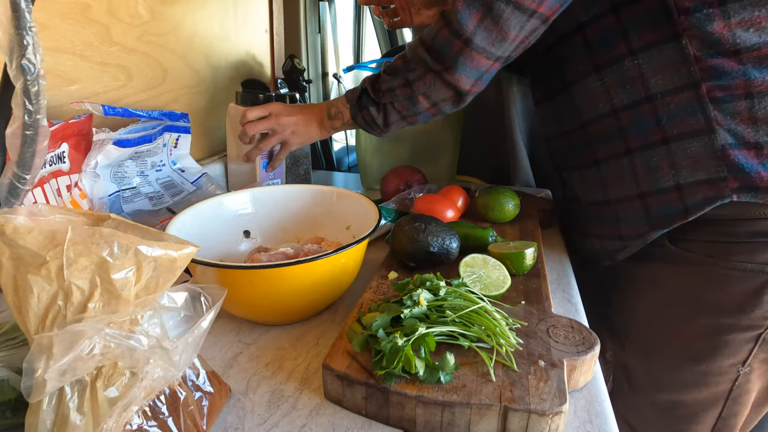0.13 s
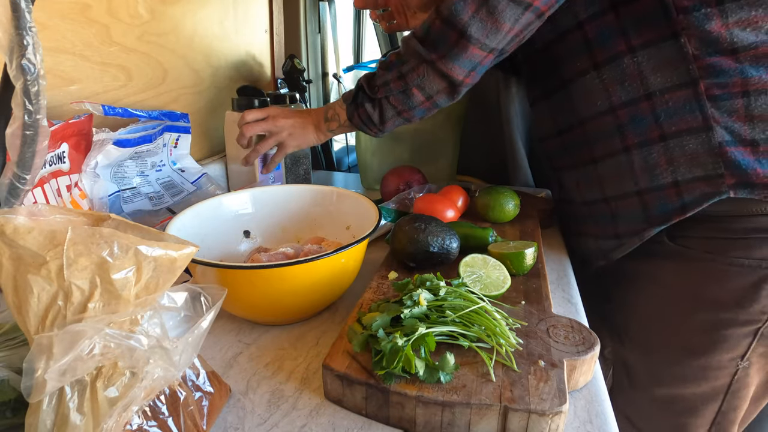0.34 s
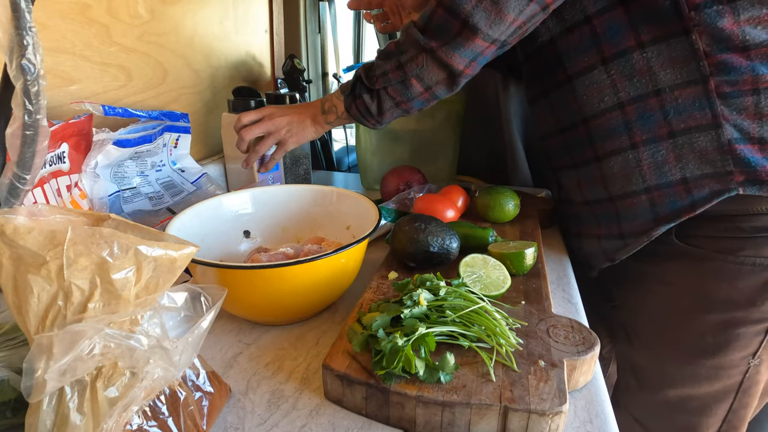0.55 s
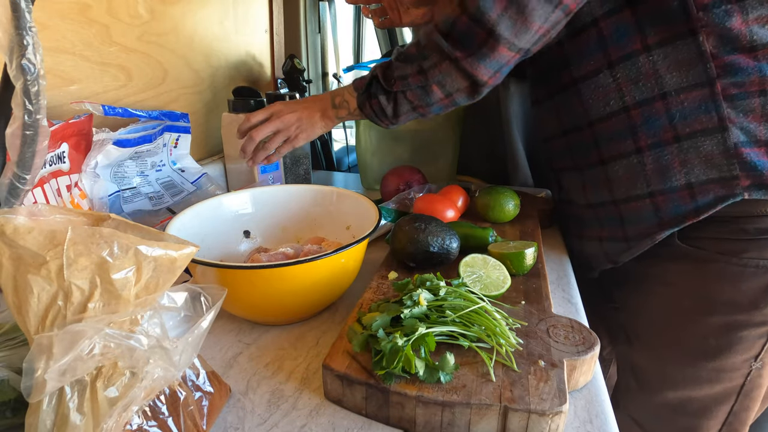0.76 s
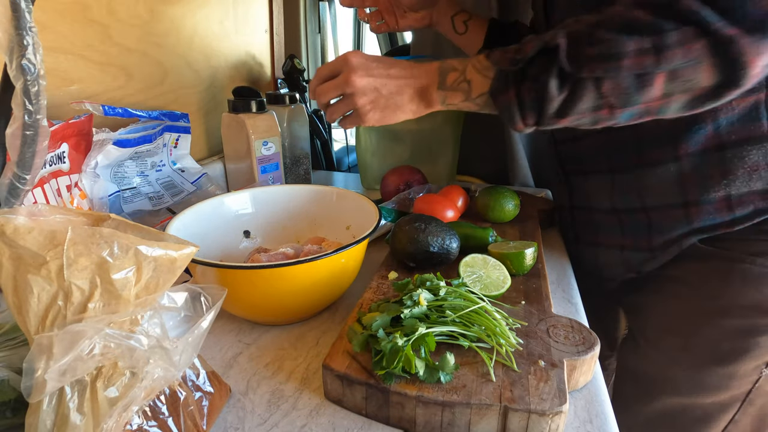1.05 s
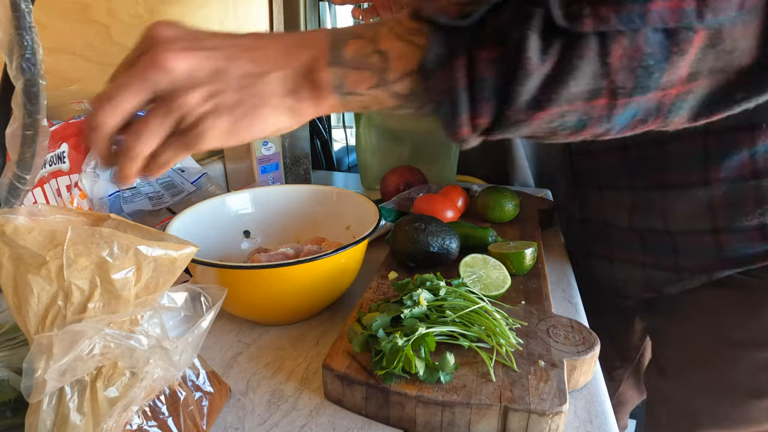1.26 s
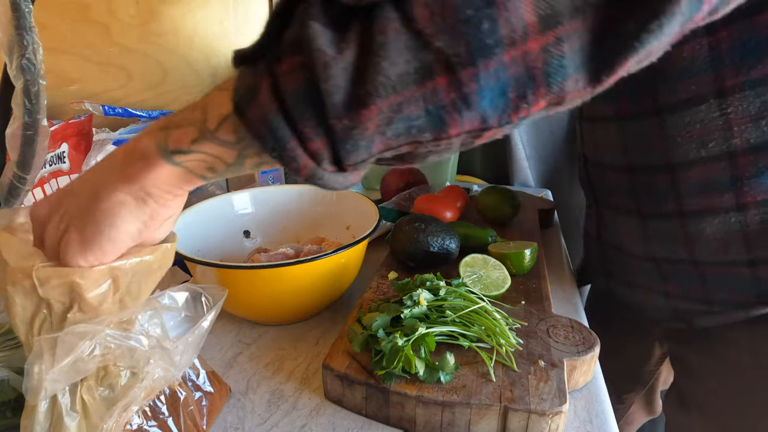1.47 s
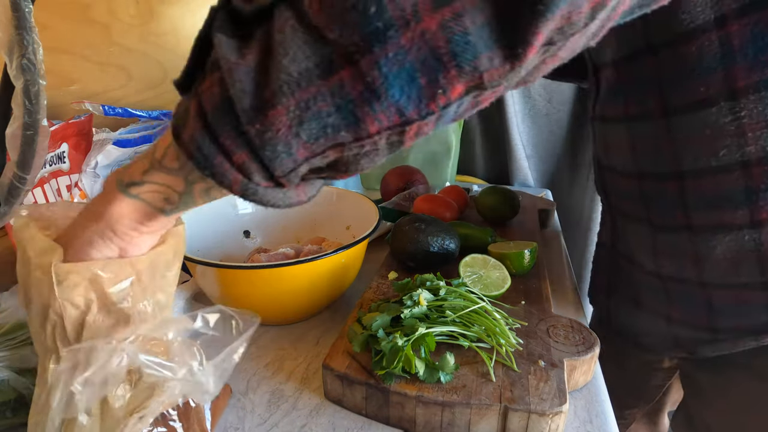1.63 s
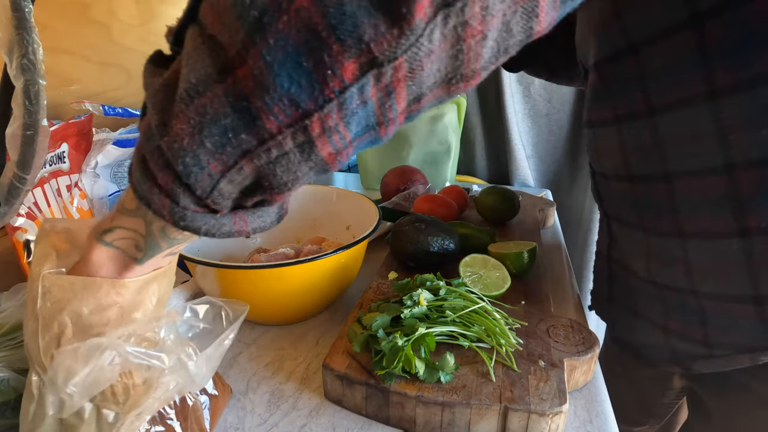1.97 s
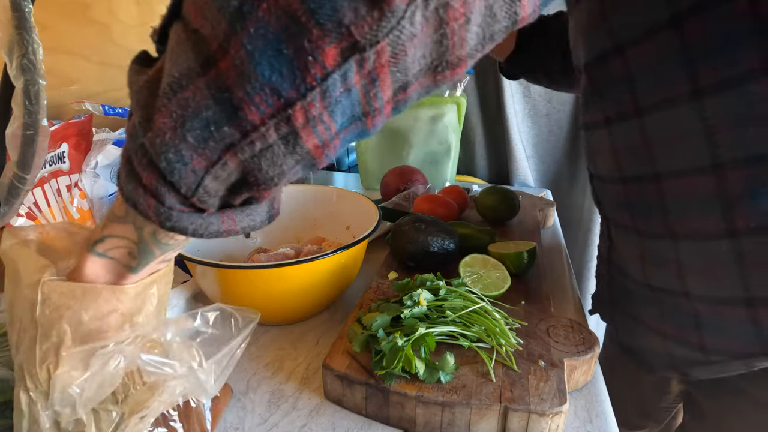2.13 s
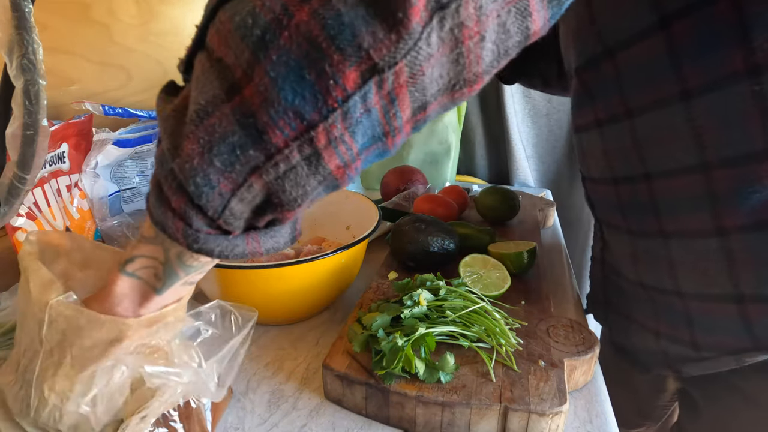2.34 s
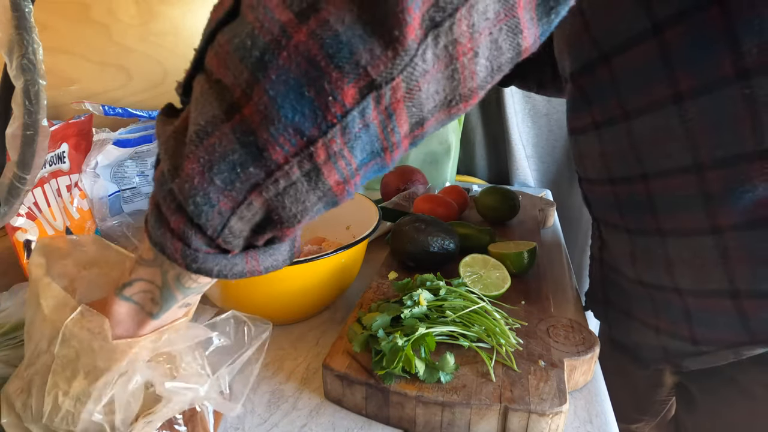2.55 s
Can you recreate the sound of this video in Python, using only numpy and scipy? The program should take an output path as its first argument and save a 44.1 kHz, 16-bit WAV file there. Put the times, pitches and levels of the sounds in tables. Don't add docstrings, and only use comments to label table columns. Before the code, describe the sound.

Paper and plastic bag crackling as a hand digs in, following a dull hollow bottle thud

```python
import sys
import numpy as np
from scipy import signal
from scipy.fft import rfft, irfft
from scipy.io import wavfile
from scipy.ndimage import uniform_filter1d

SR = 44100
rng = np.random.default_rng(int(sys.argv[2]) if len(sys.argv) > 2 else 0)


def magnitude_from_level(level_db):
    exponent = np.asarray(level_db, float) / 20
    return 10 ** exponent


def transcribe(u):
    v = np.clip(np.atleast_2d(u).T, -1, 1)
    q = np.round(v * 32767).astype(np.int16)
    wavfile.write(sys.argv[1], SR, q)


N = 119070

# f/Hz, width/Hz, level/dB
PAPER_WALLS = [(1050, 253, -4.5), (1500, 152, 3), (2132, 248, 1.5), (2704, 580, 0.5), (3630, 830, -4.5)]
# f/Hz, width/Hz, level/dB
PLASTIC_LINER = [(4620, 2160, -6.5), (6000, 1210, 0.5), (7330, 1260, -3), (10320, 2050, -7),
                 (11700, 4260, -10.5), (15200, 5700, -27)]
# f/Hz, width/Hz, level/dB
BAG_AIR = [(172, 47, -17), (275.4, 54, -13), (500, 276, -15), (680, 230, -16.5)]
# f/Hz, width/Hz, level/dB
BOTTLE_SHELL = [(405, 78, 1.5), (620, 230, 1), (1080, 64, 6), (1900, 170, -0.5), (2820, 220, -3),
                (3700, 250, -9)]
# f/Hz, level per Hz/dB
TICK_BODY = [(180, -8.5), (300, -20), (483, -19), (644, -18.5), (2120, -26), (2560, -27), (6000, -34),
             (7800, -95), (13200, -120)]
# f/Hz, level per Hz/dB
TICK_TREBLE = [(2500, -15), (4500, -4.5), (7000, -6), (9500, -3.5), (12000, -14.5), (15400, -46)]
# f/Hz, level/dB
MIC_COLOUR = [(3400, 0.5), (5100, -10), (7300, -1.5), (8400, -10), (10500, -9.5), (11700, -3), (12800, -6),
              (15000, -17)]


def bag():
    shared = crackle(3000)
    out = crackling_walls(shared)
    crease_snaps(out)
    singing_patches(out, shared)
    finger_knocks(out)
    return out


def crackling_walls(shared):
    paper_buckles = shared + 0.86 * crackle(3000)
    paper = walls(effort() * paper_buckles, PAPER_WALLS, 0.095)
    liner_buckles = shared + 0.84 * crackle(6000)
    liner = walls(effort(column=3) * liner_buckles, PLASTIC_LINER, 0.095 / 2)
    boom = ring(effort(column=4) * magnitude_from_level(14.5) * shared, BAG_AIR)
    boom = ring(boom, [(302, 630, 0.014)])
    return magnitude_from_level(3.0) * (paper + liner + boom)


def crackle(per_s):
    spread_db, clump_db, clump_s = 3.1, 1.6, 0.006
    clump = evened(uniform_filter1d(rng.standard_normal(N), max(int(clump_s * SR), 2)))
    size = magnitude_from_level(spread_db * np.minimum(rng.exponential(1, N), 4) + clump_db * clump)
    happens = rng.random(N) < per_s / SR
    return evened(size * rng.choice([-1., 1.], N) * happens)


def effort(column=None):
    # peak t/s, effort level/dB, spread t/s, liner against paper level/dB, bag boom level/dB
    pushes = [(1.435, -51.5, 0.012, 9, 20.5), (1.483, -35, 0.034, 5, -2.5), (1.56, -37.5, 0.067, 3, -1.5),
              (1.625, -32, 0.091, -1, 3), (1.699, -27, 0.058, -1, -1.5), (1.75, -35, 0.013, -9, 9),
              (1.799, -36.5, 0.025, 4.5, 6), (1.874, -25.5, 0.042, -1, 4.5), (1.901, -29, 0.0079, -12, 3),
              (1.956, -32, 0.022, -9, -8), (2.026, -25.5, 0.034, -1.5, 2.5), (2.089, -26, 0.027, -1.5, 2),
              (2.14, -39.5, 0.017, 5.5, -13), (2.173, -36, 0.015, -7, -8), (2.203, -41, 0.019, -16, 13),
              (2.228, -28, 0.017, -7, -0.5), (2.247, -29, 0.016, -20, -1), (2.292, -25.5, 0.035, -0.5, 5.5),
              (2.385, -25, 0.046, -2.5, 2.5), (2.492, -39, 0.075, -2.5, 5),
              (2.573, -38.5, 0.038, 2.5, -5.5), (2.658, -42, 0.061, 2.5, 3.5)]
    fall_over_rise, edge, touch_s, touch_rise_s = 1.263, 1.09, 1.409, 0.006
    t, power = np.arange(N) / SR, 0
    for push in pushes:
        peak_s, effort_db, spread_s = push[:3]
        shift_db = push[column] if column else 0
        away = np.where(t < peak_s, peak_s - t, (t - peak_s) / fall_over_rise) / spread_s
        power = power + magnitude_from_level(effort_db + shift_db) ** 2 * np.exp(-2 * away ** edge)
    return np.sqrt(power) * np.clip((t - touch_s) / touch_rise_s, 0, 1)


def walls(drive, bands, spread):
    facets, facet_s = 4, 0.043
    out = 0
    for k, share in zip(1 + spread * np.linspace(-1, 1, facets), turns(facet_s, count=facets)):
        out = out + ring(drive * share, [(hz * k, width, db) for hz, width, db in bands])
    return out


def crease_snaps(out):
    # t/s, peak level/dB, pitch f/Hz
    creases = [(1.4109, -38, 6120), (1.4191, -28, 1510), (1.5739, -21, 2070), (1.6067, -20, 2220),
               (1.6334, -15, 7600), (1.6781, -10, 5170), (1.6868, -16, 3490), (1.7097, -14, 1510),
               (1.7428, -19, 2170), (1.7597, -20, 2540), (1.7975, -21, 2800), (1.8373, -18, 1490),
               (1.8425, -20, 2240), (1.8497, -16, 3290), (1.8711, -12, 1530), (1.8778, -14, 2580),
               (1.8995, -14, 2240), (1.9529, -20, 1530), (1.9629, -19, 6200), (1.9713, -23, 2670),
               (1.9886, -21, 1530), (2.0094, -17, 3040), (2.0156, -15, 1530), (2.0248, -14, 1700),
               (2.0322, -14, 1940), (2.0461, -13, 6890), (2.0836, -15, 2560), (2.0967, -16, 2540),
               (2.1017, -15, 5900), (2.1198, -16, 2610), (2.1689, -28, 2560), (2.1823, -26, 2540),
               (2.2004, -21, 1440), (2.2057, -23, 1440), (2.222, -18, 1610), (2.2295, -18, 3100),
               (2.2627, -15, 6290), (2.2765, -13, 6440), (2.2834, -11, 1550), (2.2953, -10, 1530),
               (2.3014, -10, 1640), (2.3111, -14, 2200), (2.3693, -16, 2220), (2.3781, -14, 2730),
               (2.3876, -13, 2000), (2.3935, -15, 1490), (2.4049, -13, 1660), (2.4113, -14, 2000),
               (2.4178, -16, 1850), (2.4297, -15, 2630), (2.4377, -19, 2690), (2.4542, -23, 4950),
               (2.4684, -22, 2780), (2.4975, -26, 1570), (2.5307, -27, 2730), (2.5533, -23, 1530),
               (2.5618, -25, 1420), (2.6562, -30, 3270), (2.6636, -29, 1770), (2.6947, -25, 7080)]
    snap_db, tick_db, wide_db, min_t60, cycles = -4.5, -1, 3, 0.005, 16
    u = np.arange(1500) / SR
    for start, db, hz in creases:
        buckle = rng.standard_normal(len(u)) * magnitude_from_level(-60 * u / 0.0044)
        tick = magnitude_from_level(wide_db) * ring(buckle, PAPER_WALLS + PLASTIC_LINER)
        tick = tick + ring(buckle, [(hz, hz / 2, 3.0), (2 * hz, hz, -4.0)])
        fade = magnitude_from_level(-60 * u / (min_t60 + cycles / hz)) * np.minimum(u / 0.00051, 1)
        tone = np.sin(2 * np.pi * hz * u) * fade
        add(out, start, magnitude_from_level(db + snap_db) * (tone + magnitude_from_level(tick_db) * tick / abs(tick).max()))


def singing_patches(out, shared):
    # middle t/s, half-length t/s, level/dB, f/Hz
    patches = [(1.51, 0.08, -44, 2140), (1.643, 0.042, -38, 2240), (1.714, 0.023, -29.5, 1500),
               (1.873, 0.02, -27.5, 1420), (2.101, 0.058, -31, 2550), (2.177, 0.032, -41, 2540),
               (2.226, 0.021, -41, 1590), (2.384, 0.042, -33.5, 2000), (2.555, 0.028, -40.5, 1460)]
    sharpness = 14
    for middle, length, db, hz in patches:
        start = middle - length
        rub = np.hanning(int(2 * length * SR))
        buckles = shared[round(start * SR):][:len(rub)]
        add(out, start, magnitude_from_level(db) * rub * evened(ring(buckles, [(hz, hz / sharpness, 0)])))


def finger_knocks(out):
    # t/s, peak level/dB
    knocks = [(2.03, -25), (2.084, -21), (2.2, -21), (2.206, -26), (2.228, -24), (2.3, -22)]
    click = 1. * (np.arange(1500) == 0)
    low_paper = (PAPER_WALLS[0][0], PAPER_WALLS[0][1], BAG_AIR[1][2])
    knock = ring(click, BAG_AIR[1:] + [low_paper])
    for start, db in knocks:
        add(out, start, magnitude_from_level(db) * knock / abs(knock).max())


def counter():
    out = np.zeros(N)
    counter_blows(out)
    counter_sway(out)
    bottle_ticks(out)
    bottle_scrapes(out)
    return coloured(out, MIC_COLOUR)


def counter_blows(out):
    # t/s, panel level/dB, cabinet level/dB
    blows = [
        (0.195, -30.5, -40),
        (0.208, -19, -35),
        (0.228, -23, -24.5),
        (0.25, -22.5, -31.5),
        (.278, -10.5, -22),
        (0.293, -15, -17.5),
        (.306, -24.5, -12.5),
        (.378, -30, -27.5),
        (0.439, -59, -32),
        (0.542, -43, -34),
    ]
    # f/Hz, level/dB, t60/s
    panel_modes = [(155, -1, 0.15), (168.5, -17, 1.33), (248, -15, 0.1), (320, -34, 0.055)]
    # f/Hz, level/dB, t60/s
    cabinet_modes = [(81.3, 4, 0.082), (51, -5.5, 0.27), (99.7, -9.5, 0.4)]
    u = np.arange(SR) / SR
    rise = 1 - np.exp(-u / 0.0034)
    panel = rise * sum(decaying_tone(u, *mode) for mode in panel_modes)
    cabinet = rise * sum(decaying_tone(u, *mode) for mode in cabinet_modes)
    for start, panel_db, cabinet_db in blows:
        add(out, start, magnitude_from_level(panel_db) * panel + magnitude_from_level(cabinet_db) * cabinet)


def counter_sway(out):
    # start t/s, level/dB, f/Hz, t60/s
    sways = [(1.212, -45.5, 196, 0.16), (1.214, -49.5, 292, 0.14), (1.243, -47.5, 167, 0.21),
             (1.234, -32, 45.3, 0.16), (1.298, -37, 25.6, 0.49), (1.408, -43, 60, 0.16),
             (1.41, -50, 158, 0.07)]
    u = np.arange(SR) / SR
    for start, db, hz, t60 in sways:
        add(out, start, decaying_tone(u, hz, db, t60) * np.minimum(u / 0.0071, 1))


def decaying_tone(u, hz, db, t60):
    return magnitude_from_level(db - 60 * u / t60) * np.sin(2 * np.pi * hz * u)


def bottle_ticks(out):
    # t/s, peak level/dB, treble against body level/dB, t60/s, ring f/Hz
    ticks = [(0.195, -42, -35, 0.025, 1050), (0.214, -49, -35, 0.057, 1900), (.245, -39.5, -21, 0.23, 1070),
             (.272, -25.5, -26, 0.052, 627), (0.409, -47, -18, 0.053, 3700),
             (.441, -40.5, -18.5, 0.061, 2830), (.494, -36.5, -14, 0.065, 11400),
             (0.753, -51, -20.5, 0.047, 1030), (0.835, -64, -14, 0.013, 7500),
             (1.233, -57.5, -22, 0.067, 3323)]
    shell_db, ring_db = -1, 3.5
    u = np.arange(6000) / SR
    for start, db, treble_db, t60, hz in ticks:
        tick = evened(coloured(rng.standard_normal(6000), TICK_BODY))
        tick = tick + magnitude_from_level(treble_db + 20) * evened(coloured(rng.standard_normal(6000), TICK_TREBLE))
        tick = tick + magnitude_from_level(shell_db) * evened(ring(rng.standard_normal(6000), BOTTLE_SHELL))
        tick = tick + magnitude_from_level(ring_db) * evened(ring(rng.standard_normal(6000), [(hz, hz / 4, 0)]))
        shape = np.exp(-u / 0.0021) + 0.92 * magnitude_from_level(-60 * u / max(t60, 0.01))
        add(out, start, magnitude_from_level(db - 7) * shape * np.minimum(u / 0.0014, 1) * tick)


def bottle_scrapes(out):
    # start t/s, length t/s, level/dB
    scrapes = [
        (0.193, 0.135, -46),
        (0.42, 0.3, -64),
        (1.207, 0.075, -53),
        (0.12, 0.06, -64),
    ]
    drag = evened(coloured(crackle(9000), TICK_BODY))
    drag = drag + magnitude_from_level(-6.5) * evened(ring(crackle(9000), BOTTLE_SHELL))
    drag = drag + magnitude_from_level(-12.0) * evened(coloured(crackle(9000), TICK_TREBLE))
    for start, length, db in scrapes:
        w = np.linspace(0, 1, int(length * SR))
        shape = np.minimum(w / 0.03, 1) * (1 - w) ** 1.1
        add(out, start, magnitude_from_level(db) * drag[round(start * SR):][:len(w)] * shape)


def hush():
    # f/Hz, level per Hz/dB
    air = [(100, -20), (170, -10), (350, -19), (500, -14.5), (850, -21), (1400, -17), (2300, -26.5),
           (3400, -29)]
    # f/Hz, likeness [0 to 1]
    likeness = [(60, 0.99), (380, 0.39), (2380, 0.5), (15000, 0.83)]
    # f/Hz, left minus right level/dB
    balance = [(60, -14.5), (950, -3), (15000, 6.5)]
    hush_db, rumble_db, rumble_hz = -68, -68, 40
    sleeve_db, sleeve_s, cloth_db, cloth_s = 4.5, 1, 6, 0.35
    t, hz = np.arange(N) / SR, np.fft.rfftfreq(N, 1 / SR)
    a, b = rfft(rng.standard_normal((2, N)), axis=1)
    c = np.clip(read(likeness, hz), -1, 1)
    z = np.array([a, c * a + np.sqrt(1 - c ** 2) * b])
    rumble = irfft(z * hz / (hz + 10) / (1 + (hz / rumble_hz) ** 3), N, axis=1)
    lean = read(balance, hz) * np.array([[.5], [-.5]])
    z = z * magnitude_from_level(read(air, hz) + read(MIC_COLOUR, hz) + lean)
    treble = irfft(z * (hz > MIC_COLOUR[0][0]), N, axis=1)
    cloth = treble * (magnitude_from_level(cloth_db) - 1) / (1 + (t / cloth_s) ** 6)
    noise = evened(irfft(z, N, axis=1) + cloth) * magnitude_from_level(sleeve_db * np.exp(-t / sleeve_s))
    return magnitude_from_level(hush_db) * noise + magnitude_from_level(rumble_db) * evened(rumble)


def ports(x, same, lean):
    room_t60, room_db, turn_s, low_hz = 0.081, -12.5, 0.05, 500
    t, hz, tails = np.arange(6000) / SR, np.fft.rfftfreq(N, 1 / SR), 0
    for share in turns(turn_s, count=3):
        taps = rng.standard_normal((3, 6000)) * magnitude_from_level(-60 * t / room_t60) * (t > .001)
        taps = taps / np.linalg.norm(taps[0])
        tails = tails + signal.oaconvolve((x * share)[None], taps, axes=1)[:, :N]
    wet = rfft(tails, axis=1)
    c = np.clip(read(same, hz), 0, 1)
    common = rfft(x) + magnitude_from_level(room_db) * wet[0] * hz / (hz + low_hz)
    z = np.sqrt(c) * common + np.sqrt(1 - c) * wet[1:]
    return irfft(z * magnitude_from_level(read(lean, hz) * np.array([[.5], [-.5]])), N, axis=1)


def turns(s, count):
    w = uniform_filter1d(rng.standard_normal((count, N)), max(int(s * SR), 2), axis=1) ** 2
    return w / np.sqrt((w ** 2).sum(0) + 1e-30)


def ring(x, bands):
    out = 0
    for k, (hz, width, db) in enumerate(bands):
        b, a = signal.iirpeak(min(hz, SR / 2.2), hz / width, SR)
        out = out + (-1) ** k * magnitude_from_level(db) * signal.lfilter(b, a, x)
    return out


def coloured(x, points):
    return irfft(rfft(x) * magnitude_from_level(read(points, np.fft.rfftfreq(len(x), 1 / SR))), len(x))


def read(points, hz):
    f, value = np.transpose(points)
    return np.interp(np.log(hz + 1), np.log(f + 1), value)


def evened(x):
    return x / np.sqrt(np.mean(x ** 2) + 1e-20)


def add(mix, s, sound):
    part = mix[round(s * SR):][:len(sound)]
    part += sound[:len(part)]


def scene():
    # f/Hz, likeness [0 to 1]
    bag_same = [(200, .96), (1000, .96), (4500, .98), (8000, .88), (11500, .25)]
    counter_same = [(60, .95), (290, 0.96), (1400, 0.92), (15000, 0.82)]
    # f/Hz, left minus right level/dB
    bag_lean = [(240, -1), (950, 4), (4500, 2.5), (8500, 5.5), (12000, 9)]
    counter_lean = [(60, -0.5), (150, -6.5), (380, 0), (950, 3), (2380, .6), (15000, 6.5)]
    near = ports(bag(), bag_same, bag_lean) + ports(counter(), counter_same, counter_lean)
    return near + hush()


def band_limit(x):
    return signal.sosfilt(signal.butter(12, 15570, fs=SR, output="sos"), x)


def record(dry):
    shelf_hz, shelf_db, tilt_db, edge_hz = 12700, -6, -8, 15350
    edges = [0, shelf_hz - 300, shelf_hz + 300, edge_hz, edge_hz + 200, SR / 2]
    gains = [1, 1, magnitude_from_level(shelf_db), magnitude_from_level(shelf_db + tilt_db), 0, 0]
    taps = signal.firwin2(511, edges, gains, fs=SR)
    mix = signal.oaconvolve(dry, taps[None], "same", axes=1)
    return band_limit(mix)


dry = scene()
out = record(dry)
transcribe(out)
```